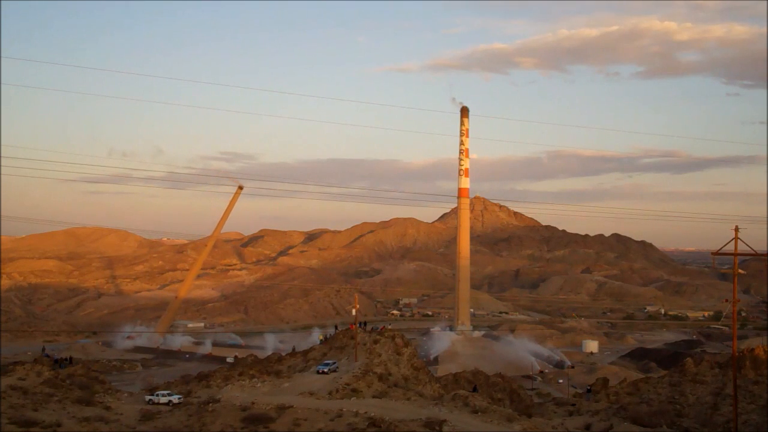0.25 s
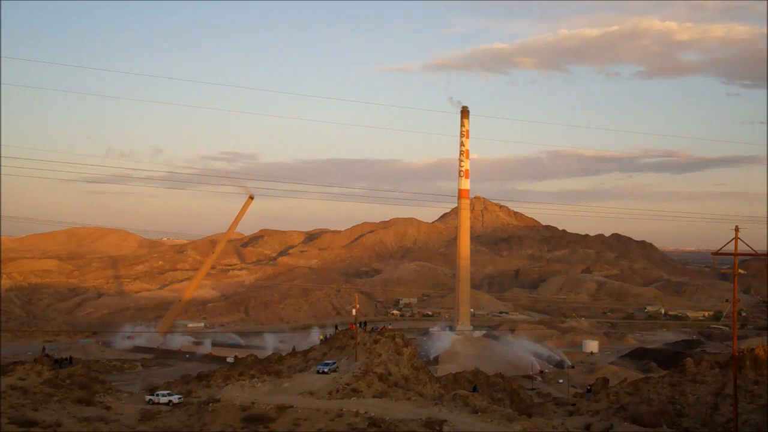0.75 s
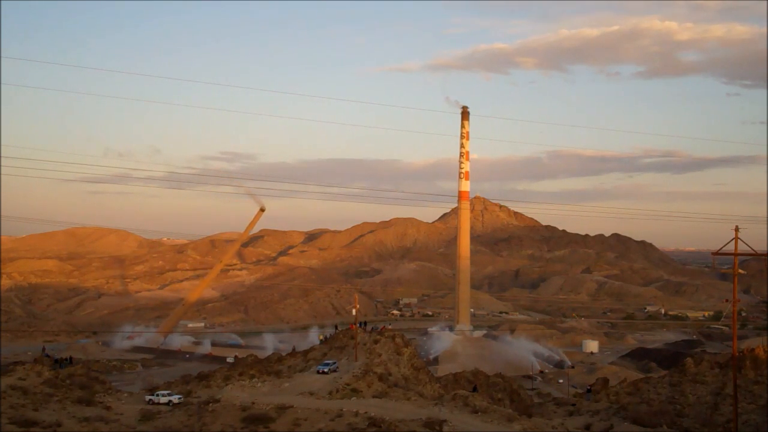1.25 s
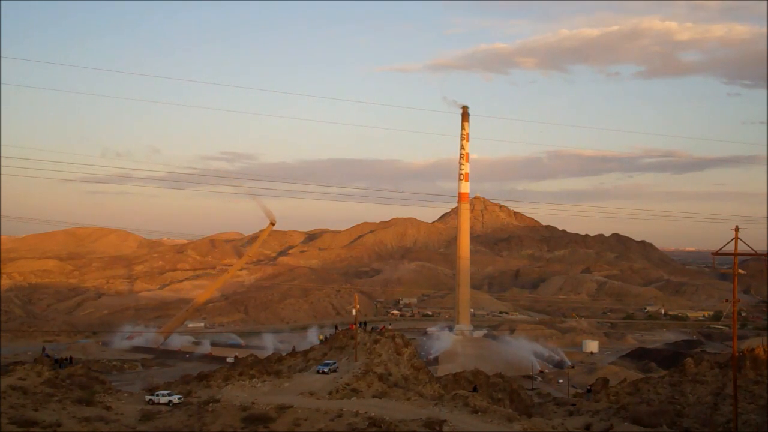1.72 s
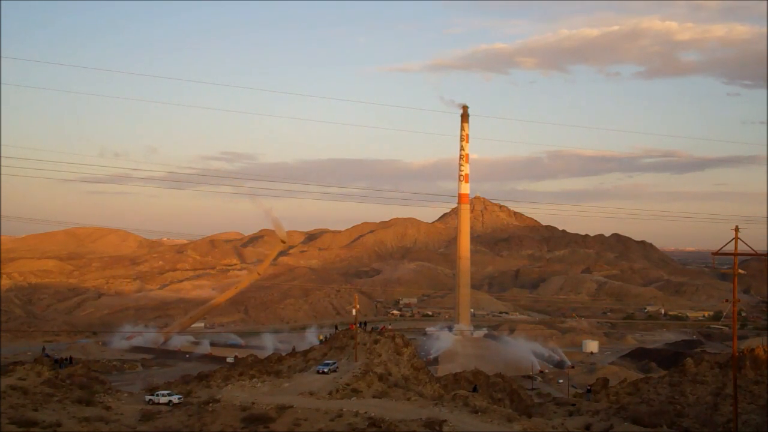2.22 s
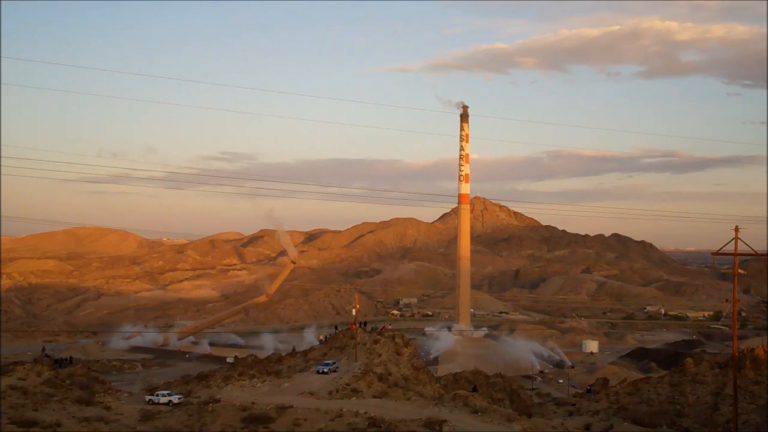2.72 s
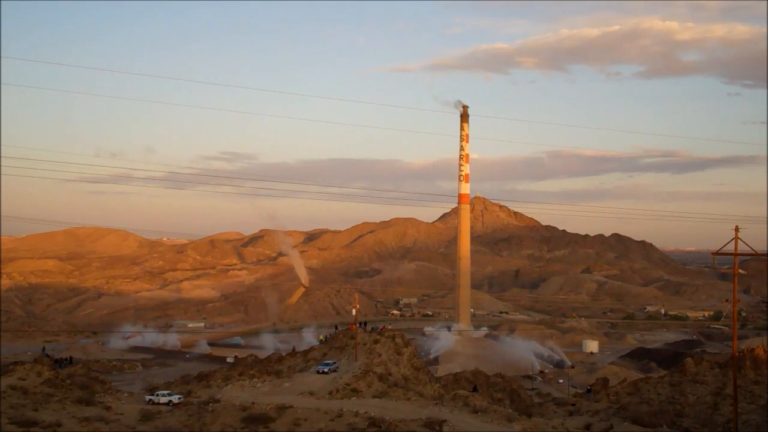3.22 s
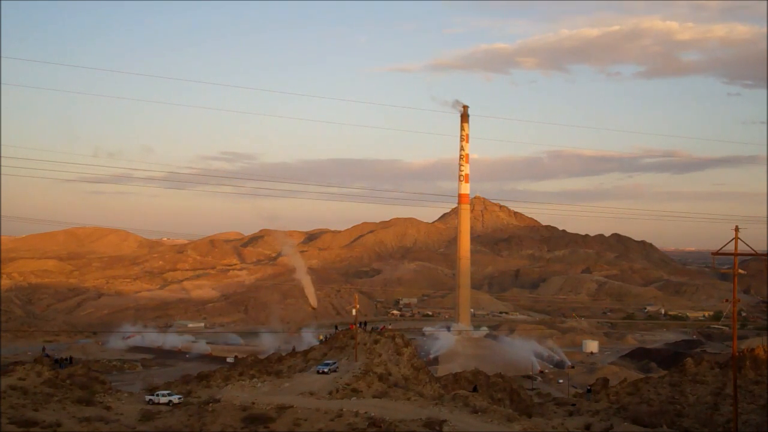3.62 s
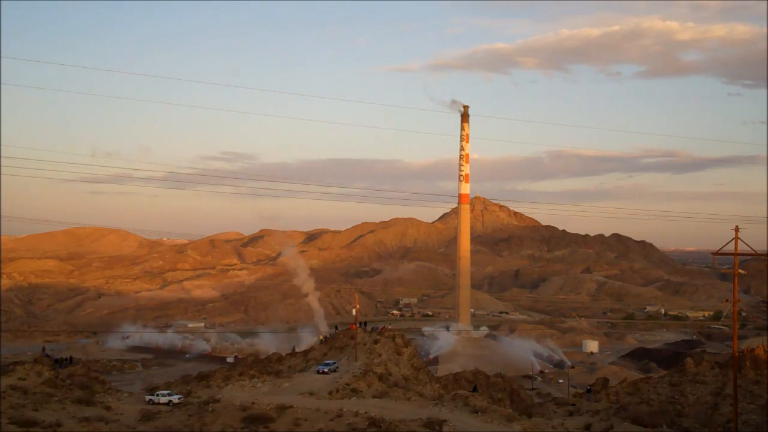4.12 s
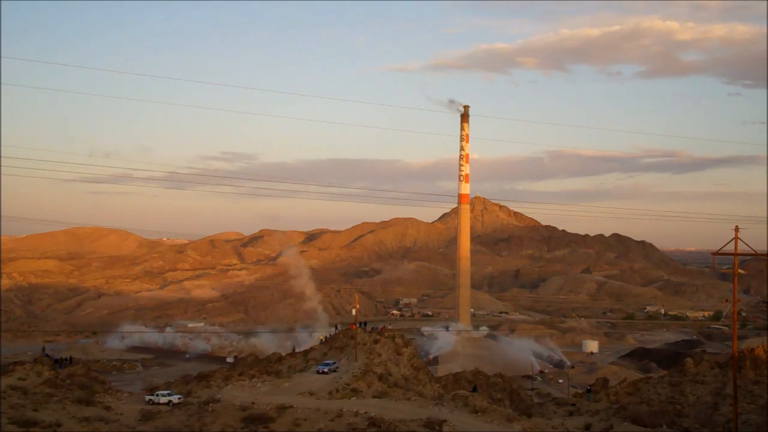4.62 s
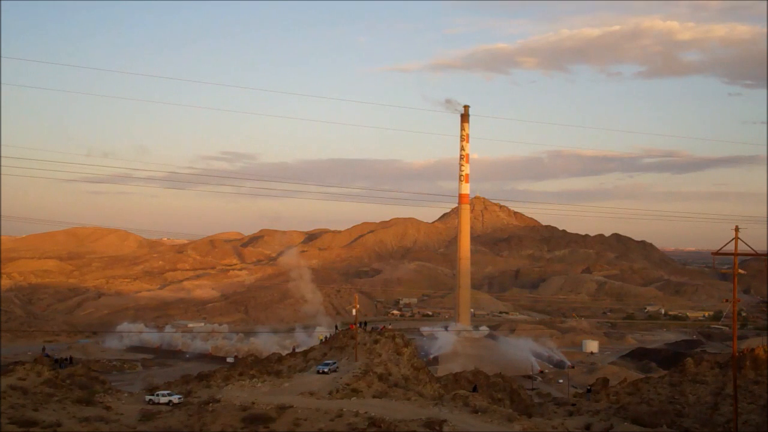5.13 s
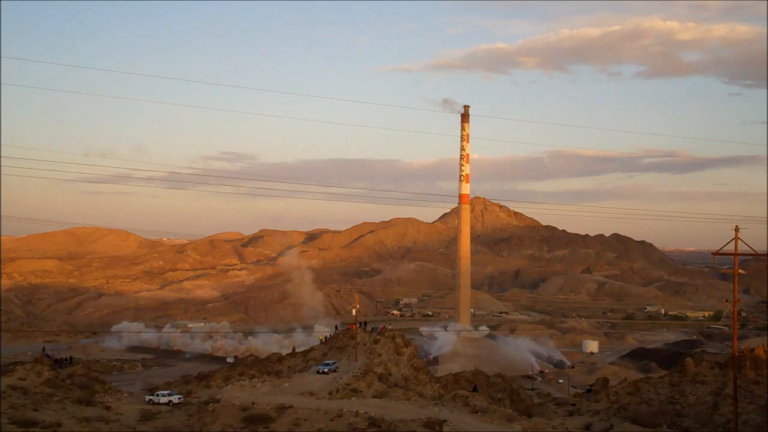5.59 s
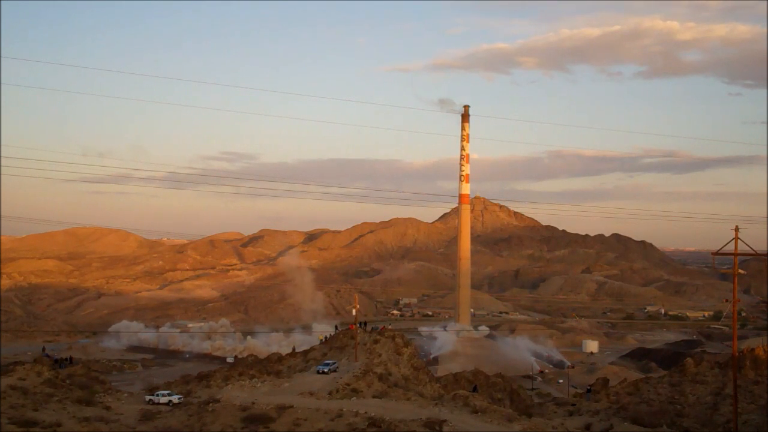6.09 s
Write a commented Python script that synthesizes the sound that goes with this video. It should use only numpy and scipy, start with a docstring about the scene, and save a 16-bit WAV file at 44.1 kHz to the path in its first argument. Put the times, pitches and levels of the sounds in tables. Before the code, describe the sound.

An outdoor demolition heard across a wide valley through an overloaded microphone with faint high hiss. Almost immediately, from 0.05 to 0.25 s, a rapid cluster of charges goes off, strongest near 0.1 s: blunt shock fronts, deep boom, mid-range bark and modest cracks, rolling off the hills. A lone weaker blast follows at 0.8 s. Falling masonry rumbles and roars continuously, with heavy low thuds crowding 1.1 to 1.65 s and another near 2 s. The collapse then eases to a softer, grainy rumble with scattered dull knocks. From about 2.4 to 5.8 s, faint air rushing from the shaft howls unevenly, rising in pitch, with a very faint brief whine near 4.1 s. Knocks, thuds and rumble swell from 5.5 s. At 6.13 to 6.3 s a last volley bursts, far brighter, with harsh cracks and sizzle, cutting off while still loud.

```python
"""Demolition charges crack first, shock fronts with boom and bark rolling round the hills; a lone one follows.
A tall chimney topples far across a valley: shaped noise rumbles and roars, blocks thud, dull knocks stand out.
Air rushing out of the shaft, noise in moving resonances, climbs in pitch until a last, brighter volley.
Loud crests overload the microphone, whose own faint hiss lies under everything."""
import sys
import numpy as np
from scipy import signal
from scipy.fft import rfft, irfft, next_fast_len
from scipy.io import wavfile
from scipy.ndimage import uniform_filter1d, map_coordinates

SR = 44100
rng = np.random.default_rng(int(sys.argv[2]) if len(sys.argv) > 2 else 0)


def generate_wav(sig):
    """Save sig (samples, or channels by samples) to the path in sys.argv[1] as 16-bit PCM at SR."""
    pcm = np.round(np.clip(np.atleast_2d(sig).T, -1, 1) * 32767).astype(np.int16)
    wavfile.write(sys.argv[1], SR, pcm)


N = 280035
TIME = np.arange(N) / SR

# All spectra are relative: they shape noise that is then set to rms 1.
# click of the overloaded recorder, also colours the crackle: hz, density_db_per_hz
CLICK_SPECTRUM = [(800, -26), (2500, 3.5), (8000, -6.5), (14000, -11.5), (15000, -31)]


def collapse(shake_trim_db=-9.0, rumble_trim_db=0.0, roar_trim_db=-1.24, grain=0.51,
             grit_db=-41, grit_growth=1.36, lumps_db=3, surge_db=1.6):
    """Masonry pounds the ground: a shake, a rumble and the roar of countless pieces, dulled by distance."""
    # ground shake: time_s, level_db (before trim)
    shake_level = [(0.36, -30.5), (1.8, -27), (1.95, -18), (2.25, -22.5), (2.6, -24), (3.45, -32.5),
                   (4.8, -29), (6.12, -57.5)]
    # weight of masonry coming down: time_s, rumble_level_db (before trim and surge)
    rumble_level = [(0.04, -20), (0.36, -19.5), (0.58, -21), (0.66, -16.5), (0.88, -24), (1.08, -17.5),
                    (1.66, -16.5), (1.78, -21.5), (1.92, -16.5), (2.34, -19), (2.72, -21.5), (2.88, -19.5),
                    (3.12, -23.5), (3.36, -23), (3.48, -26.5), (3.92, -20.5), (4.64, -22.5), (5.08, -18.5),
                    (5.38, -23.8), (5.8, -15.5), (5.88, -25), (5.98, -13.5), (6.12, -27)]
    # rubble breaking up: time_s, roar_level_db (before trim and pan)
    roar_level = [(0.36, -27.5), (0.74, -28.5), (0.9, -38), (1.1, -28), (1.42, -34), (1.58, -33.5),
                  (1.74, -41.5), (1.96, -29), (4.48, -27.5), (5.74, -21), (5.8, -22.5), (6.12, -19)]
    # each spectrum: hz, density_db_per_hz
    shake_spectrum = [(12, -11.5), (22, 5), (35, -31.5), (58, 15.5), (78, -2.5), (120, -37), (300, -100)]
    rumble_spectrum = [(40, -46), (72, -24), (98, -7), (125, -3), (150, -3), (178, -2), (240, -4),
                       (320, -19), (410, -17), (510, -30), (900, -76), (1500, -110)]
    roar_spectrum = [(200, -4.5), (330, -5), (410, 1.5), (510, -3.5), (620, -1), (790, -1.5), (1000, -12),
                     (1100, -14), (1250, -12), (1600, -26.5), (2050, -27.5), (2700, -43), (4500, -63),
                     (14000, -99.5)]

    shake_db = curves(shake_level)[0] + shake_trim_db + lumps_db * wobble(26)
    shake = amp(shake_db) * even(noise(shake_spectrum), span_s=0.1)

    rumble_db = curves(rumble_level)[0] + surge_db * wobble(14)
    rumble = amp(rumble_db + rumble_trim_db) * even(noise(rumble_spectrum), span_s=0.046)

    roar_db = curves(roar_level)[0] + roar_trim_db + 0.33 * wobble(12)
    pieces = impacts(rate_hz=650, spread_db=5.0) * grain + rng.standard_normal((2, N))
    roar = amp(roar_db) * even(coloured(pieces, roar_spectrum), span_s=0.12)

    # a fine dry crackle wherever the rumble is heavy
    crackle = coloured(impacts(rate_hz=170, spread_db=2.5), CLICK_SPECTRUM)
    grit = amp(grit_db + grit_growth * rumble_db) * crackle
    return shake + rumble + grit + roar * amp([[-.6], [.6]])


def thuds(ground_hz=180, length_s=0.0094, click_db=-27):
    """Heavy blocks heave the ground for a few cycles, each with a faint recorder click on its crest."""
    # heaviest blocks landing: crest_s, thud_db
    blocks = [(0.387, -17), (0.404, -13), (0.6683, -15), (1.0904, -14), (1.154, -8), (1.1891, -13.5),
              (1.3028, -10), (1.3755, -15), (1.4342, -15.5), (1.481, -11), (1.5953, -15.5), (1.6187, -11),
              (1.6449, -13), (1.9726, -8.5), (5.6746, -10.5), (5.7782, -9.5), (5.8203, -9.5), (5.9809, -12),
              (6.029, -15), (6.1008, -11.5)]
    low = np.zeros(N)
    for crest_s, db in blocks:
        cycles = np.cos(2 * np.pi * ground_hz * (TIME - crest_s))
        low -= amp(db) * swell(crest_s, length_s) * cycles
    times_s, thud_db = np.transpose(blocks)
    click_envelope = bursts(times_s, thud_db + click_db, t60s=0.0075, rise_s=0.00009)
    return low + click_envelope * noise(CLICK_SPECTRUM)


def dull_knocks(trim_db=-3):
    """Short dull mid-range knocks, bursts of noise, where the roar's random grain stands out."""
    # knocks in the roar: start_s, level_db (before trim)
    onsets = [(0.323, -11.5), (1.085, -22), (2.711, -26), (3.266, -24), (3.664, -23), (4.573, -22),
              (4.741, -19), (5.525, -10.5), (5.553, -18.5), (5.705, -9), (6.083, -7)]
    # hz, density_db_per_hz
    knock_spectrum = [(250, -23), (500, 14), (750, 5), (1250, -25), (2000, -14), (3500, -60.5)]
    times_s, level_db = np.transpose(onsets)
    envelope = bursts(times_s, level_db + trim_db, t60s=0.058, rise_s=0.00077)
    return envelope * even(noise(knock_spectrum), span_s=0.005)


def rush(upper_ratio=2.29, upper_db=-20, waver=0.00798, flutter_db=2.0, skirt_ratio=.85, skirt_db=-7):
    """The hollow shaft shortens as it breaks up, so the air driven through it howls ever higher, in uneven puffs."""
    # air leaving the falling shaft: time_s, resonance_hz, level_db (before flutter and pan)
    shaft = [(2.4, 545, -42), (2.9, 585, -35.5), (3.2, 612, -34.5), (3.85, 630, -34), (4.15, 685, -32.5),
             (4.4, 725, -44), (4.65, 795, -33.5), (5.15, 850, -32), (5.45, 890, -29.5), (5.7, 935, -29),
             (5.82, 967, -64)]
    # half-widths of the resonances: lower_hz, skirt_hz, upper_hz
    widths_hz = (52, 85, 175)
    # the upper resonance opens up once: crest_s, length_s, rise_db
    upper_swell = (5.25, .36, 9.5)

    centre_hz, level_db = curves(shaft)
    lower_width_hz, skirt_width_hz, upper_width_hz = widths_hz
    wavering_hz = centre_hz * (1 + waver * wobble(11))
    lower = resonance(wavering_hz, lower_width_hz, side=0.11) * amp(flutter_db * wobble(12))
    skirt = resonance(centre_hz * skirt_ratio, skirt_width_hz, side=1.0) * amp(skirt_db)

    # broad and breathy
    crest_s, length_s, rise_db = upper_swell
    opening_db = upper_db + rise_db * swell(crest_s, length_s) + 2.1 * wobble(22)
    upper = resonance(centre_hz * upper_ratio, upper_width_hz, side=0.76) * amp(opening_db)
    return amp(level_db) * (lower + skirt + upper) * amp([[-.8], [.8]])


def whine():
    """A narrow, short-lived resonance in the falling debris."""
    # crest_s, length_s, pitch_hz, level_db
    crest_s, length_s, pitch_hz, level_db = (4.12, .09, 1200, -47)
    tone = resonance(np.full(N, pitch_hz), width_hz=26, side=0.34)
    return amp(level_db) * swell(crest_s, length_s) * tone


def blasts(crackle=0.38, crack_trim_db=-2):
    """Each charge: shock front, then deep shake, boom and bark scattered by the ground, topped by a rough crack."""
    # charges: start_s, strength_db (sets all but the crack), crack_db (before trim and pan), hill_roll_t60_s
    charges = [(0.0514, -16.5, -51, 0.11), (0.075, -12, -36, 0.058), (0.089, -11, -26.5, 0.22),
               (0.096, -4.5, -19.5, 0.23), (0.105, 3, -13.5, .2), (0.1412, -15, -40.5, 0.59),
               (0.164, -13, -41, .24), (0.178, -10, -32.5, .35), (0.198, -13, -33.5, .22),
               (0.2372, -9, -33.5, 0.25), (0.25, -13, -41, .36), (0.7861, -15.5, -27, 0.089),
               (0.801, -17, -52, .11), (6.132, -20, -73, 0.53), (6.174, -12, -48, 0.41),
               (6.186, -3.5, -29.5, 0.098), (6.1931, -1, -7, 0.11), (6.216, -2, 0.5, 0.067),
               (6.219, -10.5, -7, .08), (6.231, -13, -25.5, .17), (6.242, -11.5, -33.5, .24),
               (6.268, -6, -32, .11), (6.293, -6.5, -30, 0.068), (6.302, -5.5, -24.5, .2),
               (6.308, 2, -24, 0.073)]
    # drift over the volleys: time_s, sub_re_strength_db, sizzle_re_crack_db, crack_tail_t60_s
    volleys = [(0.3, -33.5, -17, 0.16), (0.78, -24, -10.5, .04), (6.1, -10.5, -0.5, 0.33)]
    # each spectrum: hz, density_db_per_hz
    sub_spectrum = [(12, -11), (28, -3), (45, -7), (65, -8.5), (95, -0.5), (140, -21.5), (300, -79)]
    boom_spectrum = [(15, -15.5), (30, -15.5), (70, -49.5), (115, 1), (145, -10.5), (172, 5), (235, -9.5),
                     (330, -14), (700, -22.5), (2000, -80)]
    bark_spectrum = [(150, -17), (350, -4), (450, -2.5), (800, 3), (1000, -5.5), (1200, -3.5),
                     (1600, -17.5), (2100, -17), (3000, -32.5), (6000, -71)]
    crack_spectrum = [(500, -40), (1800, -0.5), (3000, 8.5), (4200, 8), (8000, -4.5), (12000, -10.5),
                      (14600, -23.5), (16000, -22.5)]
    sizzle_spectrum = [(2500, -24), (5500, 2.5), (10000, -1), (13700, 3.5), (14500, -6.5), (16000, -22.5)]

    times_s, strength_db, crack_db, roll_t60_s = np.transpose(charges)
    sub_db, sizzle_db, tail_t60_s = curves(volleys)

    # shock front: 2.5 dB at strength 0 dB, 0.36 dB more per dB of strength
    front_db = 2.5 + 0.36 * strength_db
    arrivals = np.bincount((times_s * SR).astype(int), amp(front_db), N)
    front = -signal.fftconvolve(arrivals, shock(push_s=0.0012, edge_s=0.0016))[:N]

    sub_envelope = amp(sub_db) * bursts(times_s, strength_db, t60s=.2, rise_s=0.0044)
    sub = sub_envelope * even(noise(sub_spectrum), span_s=.03)

    # longer rolls pile up more boom: 6.5 dB per doubling, 3.5 dB re strength at 0.22 s
    roll = even(noise(boom_spectrum), span_s=0.0092)
    boom_db = strength_db + 3.5 + 6.5 * np.log2(roll_t60_s / 0.22)
    boom = bursts(times_s, boom_db, roll_t60_s, rise_s=0.0014) * roll

    # the bark and its scatter off the ground
    direct = bursts(times_s, strength_db, t60s=0.055, rise_s=0.00037)
    scatter = bursts(times_s, strength_db - 19.5, t60s=0.43, rise_s=.01)
    bark = np.hypot(direct, scatter) * even(noise(bark_spectrum), span_s=0.0064)

    # the crack sputters on the crests of the boom noise, positive and negative
    sputter = unit(1 - crackle + crackle * roll ** 2)
    treble = noise(crack_spectrum) + amp(sizzle_db) * noise(sizzle_spectrum)
    snap = bursts(times_s, crack_db, 0.2 * roll_t60_s, rise_s=0.00085)
    tail_db = -29.5 + .5 * crack_db
    tail = bursts(times_s, tail_db, np.interp(times_s, TIME, tail_t60_s), rise_s=0.0014)
    crack = np.hypot(snap, tail) * sputter * treble * amp(crack_trim_db)
    return front + sub + boom + bark + crack * amp([[-1.2], [1.2]])


def hiss(trim_db=-.5, pan_db=2.5):
    """Microphone hiss: faint noise with a high sheen, stronger on the right, its level rising and sinking."""
    # time_s, level_db (before trim and pan)
    hiss_level = [(0.3, -72.5), (0.74, -60.5), (0.85, -67), (1.1, -59.5), (1.45, -61), (1.75, -66.5),
                  (2.1, -53), (5.6, -54), (5.85, -64.5)]
    # hz, density_db_per_hz
    hiss_spectrum = [(500, -8), (2900, 0.5), (3500, -2), (3800, 3.5), (4200, -3.5), (7000, -3.5),
                     (10000, -1), (11300, 8.5), (12500, -2), (14100, -1), (14600, -46.5)]
    level_db = curves(hiss_level)[0] + trim_db
    return amp(level_db) * noise(hiss_spectrum) * amp([[-pan_db], [pan_db]])


def shock(push_s, edge_s):
    """A steep push and an equal, longer suction, peak 1; the edge is rounded by the air."""
    t = TIME[:SR // 20]
    wave = np.gradient(t * np.exp(-t / push_s) * (1 - np.exp(-(t / edge_s) ** 2)))
    return wave / wave.max()


def resonance(centre_hz, width_hz, side):
    """Turbulence in a narrow, steep-sided resonance that follows the centre curve; rms 1."""
    slow = filtered(rng.standard_normal((2, 2, N)), lambda hz: 1 / (1 + (hz / width_hz) ** 3))
    phase = 2 * np.pi * np.cumsum(centre_hz) / SR
    mid, wide = slow[0] * np.cos(phase) + slow[1] * np.sin(phase)
    return unit(np.array([mid + side * wide, mid - side * wide]))


def impacts(rate_hz, spread_db):
    """Random stereo impacts of rms 1, rate_hz a second, sizes scattered by spread_db."""
    hits = rng.random((2, N)) < rate_hz / SR
    sizes = rng.standard_normal((2, N)) * amp(max(spread_db, 0) * rng.standard_normal((2, N)))
    return unit(hits * sizes)


def bursts(times_s, levels_db, t60s, rise_s):
    """Envelope of sounds that swell, die away and end within 0.5 s; overlapping ones add in power."""
    power = np.zeros(N)
    for start_s, db, t60 in np.broadcast(times_s, levels_db, t60s):
        start = int(start_s * SR)
        t = TIME[:min(N - start, SR // 2)]
        decay = amp(db - 60 * t / t60)
        onset = 1 - np.exp(-(t / rise_s) ** 2)
        power[start:start + len(t)] += (decay * onset) ** 2
    return np.sqrt(power)


def swell(crest_s, length_s):
    """A smooth rise and fall, 1 at the crest and 1/e at length_s either side."""
    return np.exp(-((TIME - crest_s) / length_s) ** 2)


def wobble(rate_hz):
    """A smooth random curve, rate_hz knots a second."""
    knots = rng.standard_normal(int(N * rate_hz / SR) + 4)
    return map_coordinates(knots, [TIME * rate_hz])


def noise(spectrum):
    """Stereo noise of rms 1."""
    return coloured(rng.standard_normal((2, N)), spectrum)


def coloured(pair, spectrum):
    """Two unrelated signals as a stereo sound of rms 1: near mono in the bass, wide in the treble."""
    # hz, left_right_correlation
    likeness = [(30, 0.99), (170, 1), (300, 0.98), (600, 0.88), (1200, 0.9), (2200, 0.33), (6000, 0.22),
                (12000, 0.18)]

    def mid_side(hz):
        angle = np.arccos(np.clip(along(likeness, hz), -1, 1)) / 2
        return amp(along(spectrum, hz)) * [np.cos(angle), np.sin(angle)]

    mid, side = filtered(pair, mid_side)
    return unit(np.array([mid + side, mid - side]))


def even(x, span_s):
    """x with its chance swells longer than span_s levelled out."""
    size = max(int(span_s * SR), 8)
    power = np.mean(x ** 2, axis=0)
    power = uniform_filter1d(uniform_filter1d(power, size), size)
    return x / np.sqrt(np.abs(power) + 1e-9)


def filtered(x, response):
    """x times a response of frequency."""
    m = next_fast_len(N + SR // 4)
    return irfft(rfft(x, m) * response(np.fft.rfftfreq(m, 1 / SR)), m)[..., :N]


def curves(rows):
    """One value per sample for each column after the time."""
    s, *columns = np.transpose(rows)
    return [np.interp(TIME, s, column) for column in columns]


def along(points, hz):
    """(Hz, value) points read on a log axis."""
    f, v = np.transpose(points)
    return np.interp(np.log(hz + 1), np.log(f + 1), v)


def amp(db):
    """Decibels to gain."""
    return 10 ** (np.asarray(db) / 20)


def unit(x):
    """x at rms 1."""
    return x / np.sqrt(np.mean(x ** 2) + 1e-20)


def flatten(x, top, hardness):
    """Crests above top are pressed flat."""
    return x / (1 + np.abs(x / top) ** hardness) ** (1 / hardness)


def scene():
    """Collapse and charges, a little to the right, over the hiss."""
    valley = collapse() + thuds() + dull_knocks() + rush() + blasts() + whine()
    return valley * amp([[-.15], [.15]]) + hiss()


def record(dry, split_hz=2200, top_hz=16400):
    """Big slow waves flatten first, sooner on the left; treble rides on them to full scale, cut above top_hz."""
    low = filtered(dry, lambda hz: 1 / (1 + (hz / split_hz) ** 4))
    treble = dry - low
    low_top = np.array([[.85], [.98]])  # left, right
    x = flatten(low, low_top, hardness=23.0) + treble
    x = flatten(x, 1, hardness=30)
    return filtered(x, lambda hz: hz < top_hz)


dry = scene()
out = record(dry)
generate_wav(out)
```